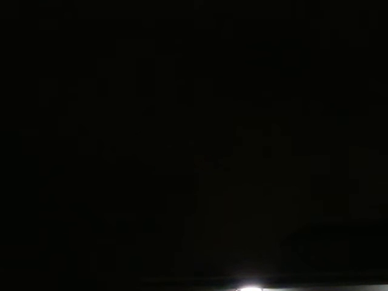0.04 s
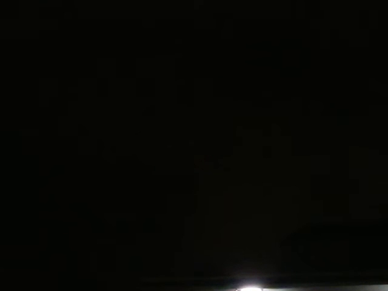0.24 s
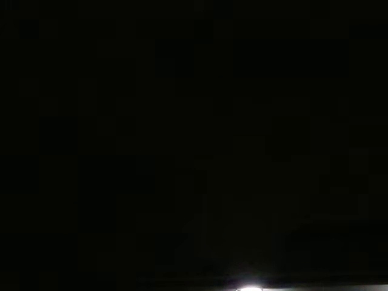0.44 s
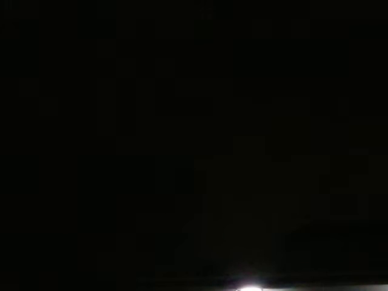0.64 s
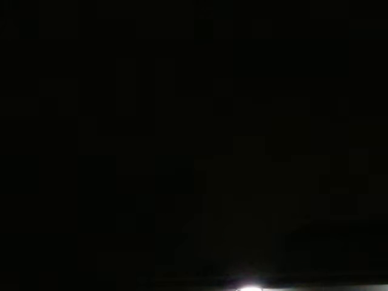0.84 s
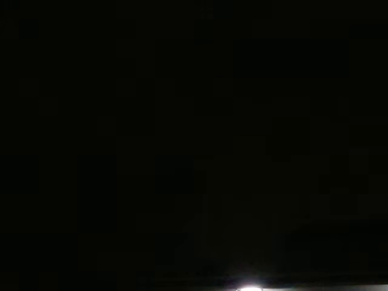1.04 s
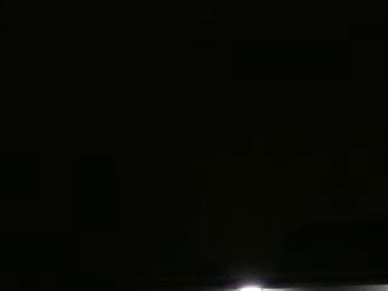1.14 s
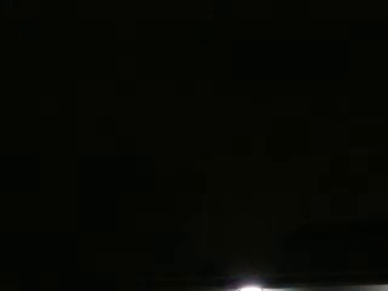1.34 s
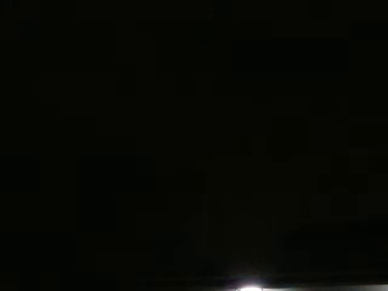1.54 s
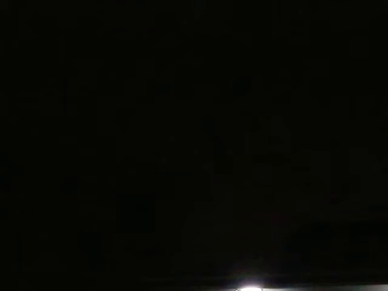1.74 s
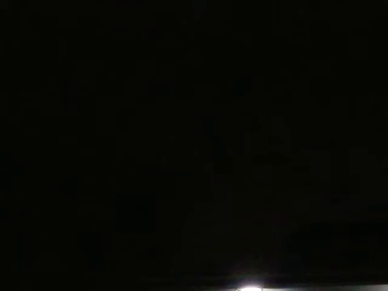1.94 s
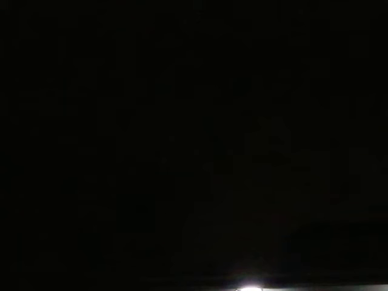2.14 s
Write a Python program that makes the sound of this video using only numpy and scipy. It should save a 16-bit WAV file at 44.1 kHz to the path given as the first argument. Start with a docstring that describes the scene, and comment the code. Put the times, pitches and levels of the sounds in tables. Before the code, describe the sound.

A firework bangs sharply, then a rumbling echo fades across the town.

```python
"""A town at night: a firework shell bursts overhead and its pressure pulse overloads the microphone.
Nearby walls and houses scatter the pulse. Far blocks of buildings answer with a broad echo and
fainter, duller pops while a rumble rolls away, a thin ring showing briefly in it.
Under it lies the steady wash of distant streets; a faint hiss passes near the end."""
import sys
import numpy as np
from scipy import signal
from scipy.fft import rfft, irfft, next_fast_len
from scipy.io import wavfile

SR = 44100
rng = np.random.default_rng(int(sys.argv[2]) if len(sys.argv) > 2 else 0)


def inscribe(sig):
    """Save sig as 16-bit PCM at rate SR to the path in sys.argv[1].

    A 1-D sig is mono; a 2-D sig holds one channel per row.
    Samples are clipped to [-1, 1] before scaling.
    """
    pcm = np.round(np.clip(np.atleast_2d(sig).T, -1, 1) * 32767)
    wavfile.write(sys.argv[1], SR, pcm.astype(np.int16))


N = 97020
BURST_S = .22378  # arrival of the direct pulse
HOLLOW_HZ, HOLLOW_WIDTH_HZ = 296.5, 29  # resonance in rumble and echoes


def amp(db):
    """Decibels to gain."""
    return 10 ** (np.asarray(db) / 20)


def unit(x):
    """x at rms 1."""
    return x / np.sqrt(np.mean(x ** 2) + 1e-20)


def along(points, hz):
    """Interpolate (f/Hz, value) points on a log axis."""
    f, v = np.transpose(points)
    return np.interp(np.log(hz + 1), np.log(f + 1), v)


def since(start_s):
    """Seconds since start_s, per sample."""
    return np.arange(N) / SR - start_s


def filtered(x, response):
    """x through a complex frequency response."""
    size = next_fast_len(N + SR // 2)
    return irfft(rfft(x, size) * response(np.fft.rfftfreq(size, 1 / SR)), size)[..., :N]


def swell(peak_s, rise_s, fall_s):
    """Exponential rise and fall about peak_s."""
    t = since(peak_s)
    return np.exp(np.minimum(t / rise_s, -t / fall_s))


def ring(centre_hz, width_hz):
    """Wavering narrow-band noise, rms 1."""
    noise = rng.standard_normal(N)
    return unit(filtered(noise, lambda hz: 1 / (1 + (2 * (hz - centre_hz) / width_hz) ** 2)))


def wash(spectrum, correlation, tilt_db=0, uneven=0, travel_s=0):
    """Countless arrivals of uneven size, coloured and dulled by their travel; stereo, rms 1."""
    def mid_side_gain(hz):
        air_db = -5.5 * travel_s * (hz / 3000) ** 2
        colour = amp(along(spectrum, hz) + tilt_db * np.log2(1 + hz / 600) + air_db)
        angle = np.arccos(np.clip(along(correlation, hz), -1, 1)) / 2
        return colour * [np.cos(angle), np.sin(angle)]

    arrivals = rng.standard_normal((2, N)) * np.exp(uneven * rng.standard_normal(N))
    mid, side = filtered(arrivals, mid_side_gain)
    return unit(np.array([mid + side, mid - side]))


def reverberant(x, t60, build_s):
    """x builds up after the burst, then each frequency decays at its own rate."""
    hz, t, bins = signal.stft(x, SR, nperseg=256)
    decay = amp(-60 * np.maximum(t - BURST_S, 0) / along(t60, hz)[:, None])
    decayed = signal.istft(bins * decay, SR, nperseg=256)[1][:, :N]
    build = 1 - np.exp(-(np.maximum(since(BURST_S), 0) / build_s) ** 2)
    return decayed * build


# Street spectrum: f/Hz, relative level/dB
STREET_SPECTRUM = [(15, -66), (25, -2.5), (75, -1.5), (152, -8.5), (433, -11.5), (598, -6), (826, -9),
                   (1170, -5), (1270, -11.5), (1620, -10.5), (1800, -11.5), (2060, -18), (3440, -25.5),
                   (4040, -29.5), (15500, -36)]
# Street stereo image: f/Hz, L-R correlation
STREET_CORRELATION = [(60, 0.98), (200, .7), (1200, 0.82), (3000, 0.6), (8000, 0.29), (15000, 0.16)]


def streets():
    """Distant streets merge into a steady wash."""
    return amp(-51.5) * wash(STREET_SPECTRUM, STREET_CORRELATION)


# Hiss spectrum: f/Hz, relative level/dB
HISS_SPECTRUM = [(1000, -18), (2600, -5.5), (4700, -7), (6300, -15), (9000, -16), (12000, -29),
                 (16000, -26)]


def hiss():
    """One faint, brief hiss near the end."""
    envelope = swell(peak_s=2.1, rise_s=.012, fall_s=0.057)
    return amp(-56.5) * envelope * wash(HISS_SPECTRUM, correlation=[(4000, 0.6)])


def thin_ring():
    """A brief high ring in the decay."""
    envelope = swell(peak_s=0.61, rise_s=0.045, fall_s=0.036)
    return amp(-62) * envelope * ring(centre_hz=4090, width_hz=47)


# Rumble spectrum: f/Hz, relative level/dB
RUMBLE_SPECTRUM = [(25, -54), (60, -10.5), (110, -4), (160, -6.5), (215, 1), (295, -1), (350, -4.5),
                   (430, -2.5), (540, -10.5), (740, -6.5), (900, -9), (1200, -10), (1700, -17.5),
                   (2300, -20.5), (4000, -28.5), (6000, -45), (12000, -51)]
# Rumble decay: f/Hz, T60/s
RUMBLE_T60 = [(60, 5), (300, 5.7), (1200, 7.9), (3000, 4.43), (7000, 1.8)]
# Stereo image of all scattered sound: f/Hz, L-R correlation
SCATTER_CORRELATION = [(55, 0.84), (130, 0.71), (290, 0.62), (700, 0.79), (1400, 0.83), (3100, 0.65),
                       (8000, 0.74)]


def rumble():
    """The whole town reverberates with a hollow ring; the treble dies first."""
    scatter = wash(RUMBLE_SPECTRUM, SCATTER_CORRELATION, uneven=0.62)
    hollow = amp(-9.5) * ring(HOLLOW_HZ, HOLLOW_WIDTH_HZ)
    return amp(-35.5) * reverberant(scatter + hollow, RUMBLE_T60, build_s=0.072)


# Echoes off far blocks: t/s, level/dB, rise/s, fall/s, treble tilt/(dB/oct), relative ring level/dB
BLOCK_ECHOES = [(.410, -32.5, 0.0097, 0.013, -6, -1), (0.442, -25.5, 0.021, 0.034, 0, -19),
                (0.492, -34.5, 0.014, 0.049, 0.5, -4), (0.621, -37.5, 0.03, 0.09, 0.5, -23),
                (0.726, -44, 0.0049, 0.0054, 4, 8.5), (0.809, -40.5, .02, 0.026, -1, -23),
                (1.002, -39, 0.0068, 0.02, 0, -17), (1.044, -32.5, 0.013, 0.016, -1, -14),
                (1.086, -43.5, 0.019, 0.044, 1.5, -10.5), (1.199, -42, 0.058, 0.055, 1.5, -4),
                (1.263, -43.5, 0.0074, 0.015, 4, 4), (1.314, -40, 0.011, 0.018, -1, 6.5),
                (1.605, -41.5, 0.017, 0.016, 3, -22), (1.657, -47, 0.0031, 0.016, -20, 0),
                (1.959, -40, 0.0047, 0.0078, 5, -33)]
# Echo spectrum before tilt and air loss: f/Hz, relative level/dB
ECHO_SPECTRUM = [(25, -35), (60, -22), (110, -16.5), (160, -15), (225, -1.5), (300, -5), (450, -0.5),
                 (540, -14), (720, 1.5), (900, -7), (1150, -6), (1500, -7.5), (1850, -11.5), (2100, -14.5),
                 (3400, -22.5), (5000, -29.5), (8000, -44), (15000, -63)]


def block_echoes():
    """Each far block returns a smeared cluster of reflections; longer paths lose more treble."""
    echoes = np.zeros((2, N))
    for peak_s, level_db, rise_s, fall_s, tilt_db, ring_db in BLOCK_ECHOES:
        cluster = wash(ECHO_SPECTRUM, SCATTER_CORRELATION, tilt_db, uneven=0.41,
                       travel_s=peak_s - BURST_S)
        hollow = amp(ring_db) * ring(HOLLOW_HZ, HOLLOW_WIDTH_HZ)
        echoes += amp(level_db) * swell(peak_s, rise_s, fall_s) * (cluster + hollow)
    return echoes


# House scatter spectrum: f/Hz, relative level/dB
HOUSE_SPECTRUM = [(25, -34), (50, -14), (85, -5.5), (104, -19), (130, -13.5), (165, -10.5), (270, -1),
                  (320, -10), (390, 1.5), (525, -17), (620, -7.5), (790, -2.5), (890, -20), (1010, -14.5),
                  (1180, -2), (1350, -22), (1550, -12), (1700, -23), (1900, -8), (2100, -18.5),
                  (3500, -27.5), (4400, -32), (6500, -43.5), (9000, -61.5), (15000, -76)]
# House scatter decay: f/Hz, T60/s
HOUSE_T60 = [(80, 0.39), (300, 0.31), (1000, 0.19), (3000, 0.22), (9000, 0.26)]


def house_scatter():
    """Dense scatter from nearby houses gives the bang its body."""
    scatter = wash(HOUSE_SPECTRUM, SCATTER_CORRELATION, uneven=0.2)
    return amp(-11.5) * reverberant(scatter, HOUSE_T60, build_s=0.0083)


def two_pole(ratio, q):
    """Second-order low-pass response at ratio = f / corner."""
    return 1 / (1 - ratio ** 2 + 1j * ratio / q)


def blast_wave(arrival_s, front_hz, push_s=0.0018, air_hz=4540, mic_low_hz=264):
    """Steep push, then longer suction, rounded by the air and thinned by the microphone; peak 1."""
    def response(hz):
        bass_cut = -(hz / mic_low_hz) ** 2 * two_pole(hz / mic_low_hz, q=0.42)
        air_loss = two_pole(hz / air_hz, q=0.78) ** 2
        rounded_front = 1 / (1 + 1j * hz / front_hz) ** 2
        return bass_cut * air_loss * rounded_front

    t = since(arrival_s)
    age = np.maximum(t / push_s, 0)
    onset = np.clip(t * SR, 0, 1)
    pressure = filtered(onset * (1 - age) * np.exp(-age), response)
    return pressure / pressure.max()


# Closest wall reflections: delay/s, left level/dB, right level/dB (re direct pulse)
WALL_REFLECTIONS = [(.0029, -18, -3.5), (.0063, -27, -26), (0.0112, -21, -21), (0.0187, -12.5, -20),
                    (0.0238, -13, -17.5)]


def shell_burst(right_lag_s=.00003):
    """The shell's direct pulse and its duller copies off the closest walls."""
    direct = np.array([blast_wave(BURST_S + lag_s, front_hz=1320) for lag_s in (0, right_lag_s)])
    walls = sum(amp([[left_db], [right_db]]) * blast_wave(BURST_S + delay_s, front_hz=990)
                for delay_s, left_db, right_db in WALL_REFLECTIONS)
    return amp(4.5) * (direct + walls)


def scene():
    """Stereo sum at the microphone, before overload."""
    return shell_burst() + house_scatter() + block_echoes() + rumble() + thin_ring() + hiss() + streets()


def record(dry, low_hz=36.6, top_hz=15900):
    """Bass cut, overload, band limit; the microphone gives way earlier and more softly under suction."""
    thin = signal.sosfilt(signal.butter(2, low_hz, "highpass", fs=SR, output="sos"), dry)
    limit = np.where(thin > 0, 1, 0.93)
    hardness = np.where(thin > 0, 12, 2)
    clipped = thin / (1 + np.abs(thin / limit) ** hardness) ** (1 / hardness)
    return filtered(clipped, lambda hz: hz < top_hz)


dry = scene()
out = record(dry)
inscribe(out)
```